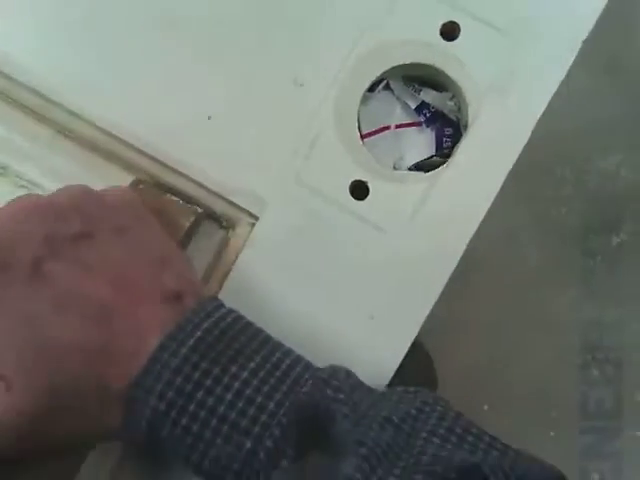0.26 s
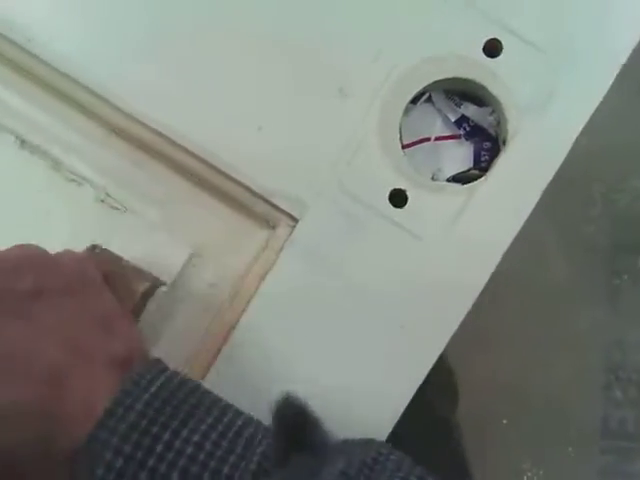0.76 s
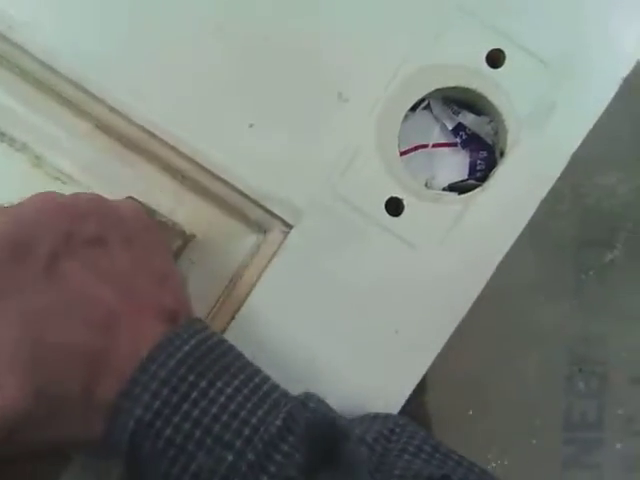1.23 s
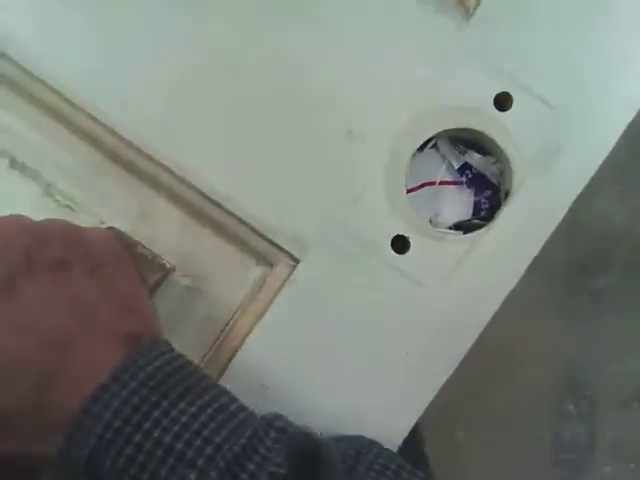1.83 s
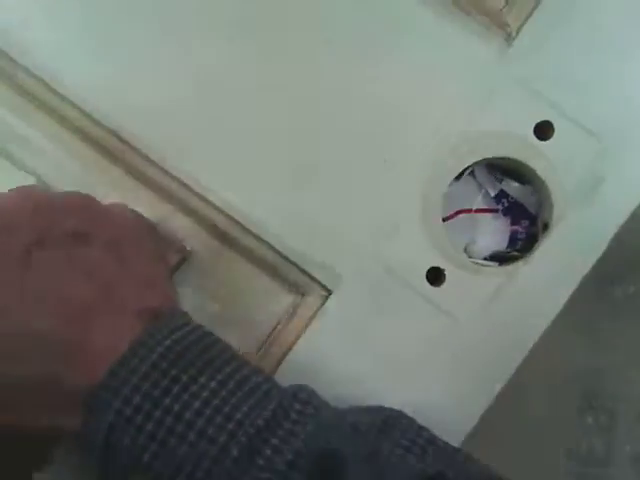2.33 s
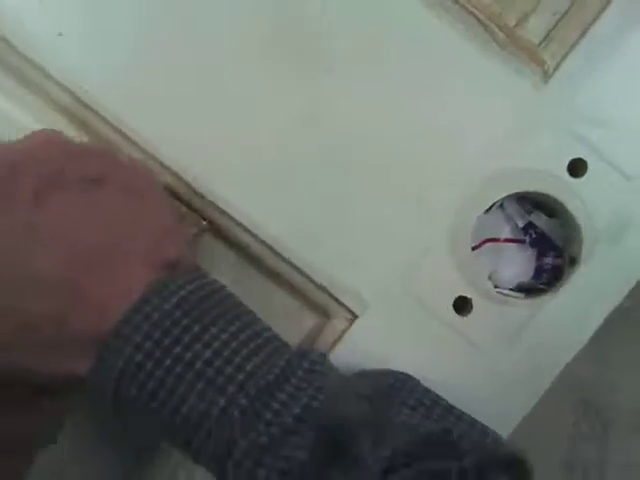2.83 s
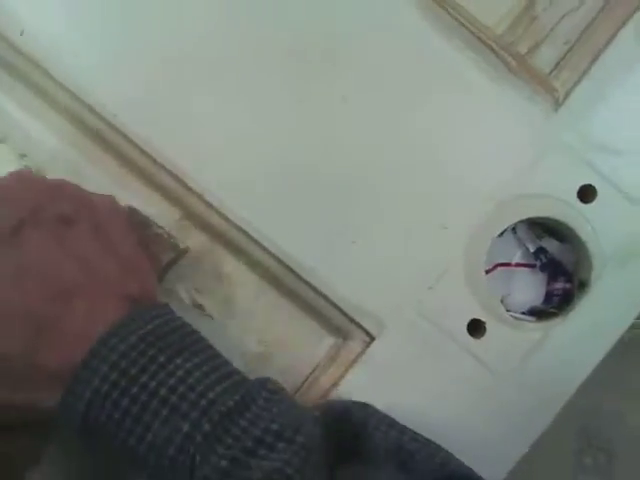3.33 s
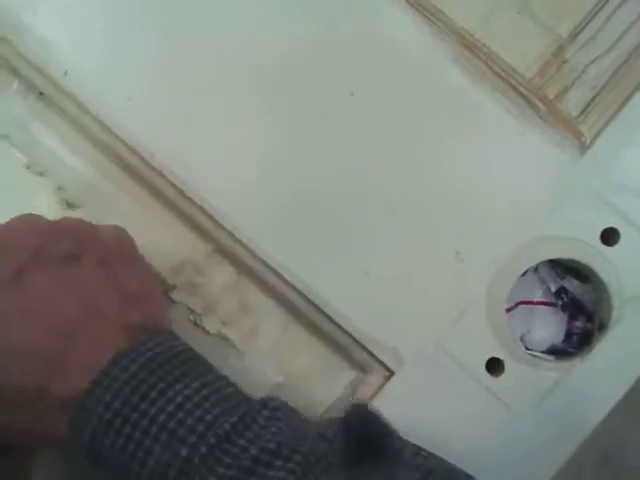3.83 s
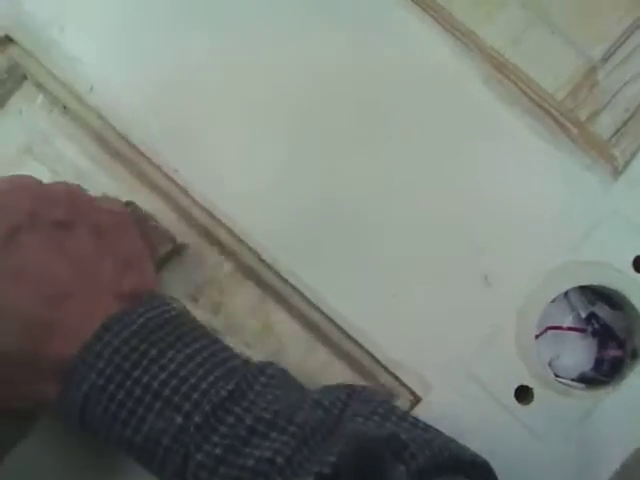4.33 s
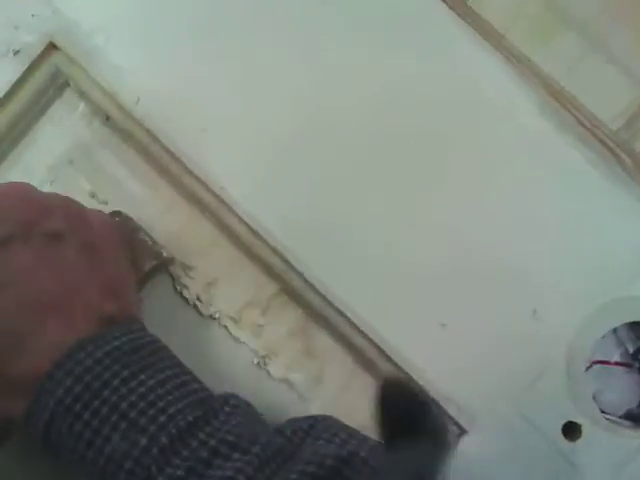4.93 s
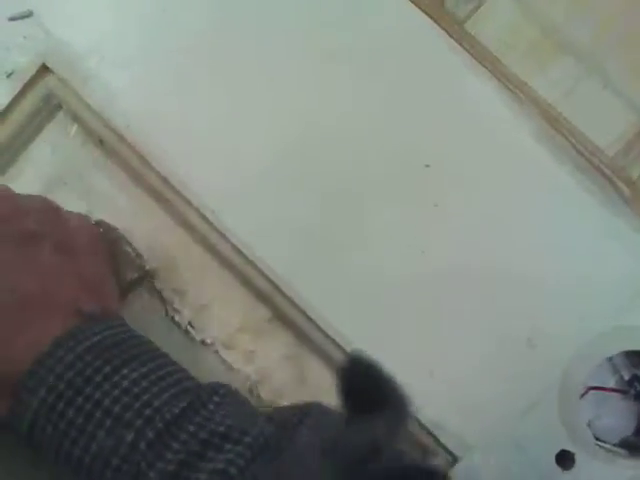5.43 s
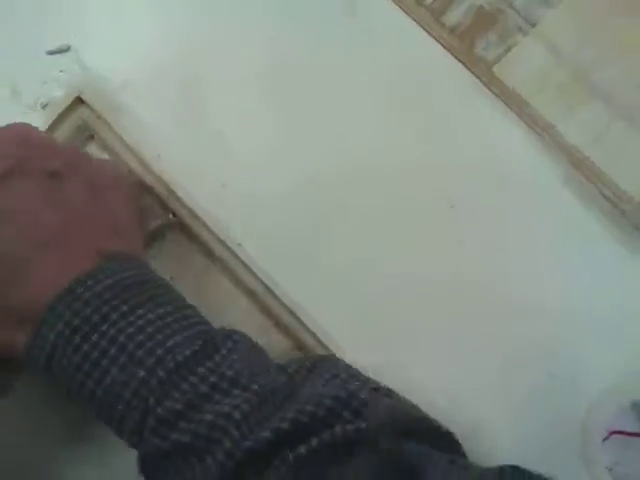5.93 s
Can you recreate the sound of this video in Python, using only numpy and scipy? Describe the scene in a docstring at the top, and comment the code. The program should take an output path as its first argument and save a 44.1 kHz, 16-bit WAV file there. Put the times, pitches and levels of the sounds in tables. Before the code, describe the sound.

Heard from close by in a small workroom, a blade scrapes back and forth on a painted wooden door in a quick, even rhythm. Each gritty pull is followed by a lighter push. Wooden knocks against the moulding cluster around the middle, and small cracks of breaking paint come mostly near the end. Soft rushing air and a low electrical hum continue underneath, all slightly muffled by the microphone.

```python
"""Scraping paint from a door

A hand scraper rasps old paint off a wooden door: about two and a half pulls a second, with lighter pushes
between. Stick-slip friction excites the resonances of the panel and the steel blade; chips snap off, and
now and then the tool knocks on the moulding. A small workroom adds reverberation, a fan-like rush and
mains hum. All is heard from close by, through a small narrow-band camera."""
import sys
import numpy as np
from scipy import signal
from scipy.fft import rfft, irfft, next_fast_len
from scipy.io import wavfile

SR = 44100
rng = np.random.default_rng(int(sys.argv[2]) if len(sys.argv) > 2 else 0)


def inscribe(sig):
    """Save sig as 16-bit PCM at rate SR to the path in sys.argv[1].

    A 1-D sig is mono; a 2-D sig holds one channel per row.
    Samples are clipped to [-1, 1] before scaling.
    """
    pcm = np.round(np.clip(np.atleast_2d(sig).T, -1, 1) * 32767)
    wavfile.write(sys.argv[1], SR, pcm.astype(np.int16))


N = 272097

# cutting pulls: (start [s], length [s], door level [dB], blade level [dB], door resonance [Hz],
# blade resonance [Hz], approach level relative to the bite [dB])
PULL_STROKES = [(0.605, 0.046, -19.5, -26, 1170, 2580, -17), (1.13, 0.049, -33, -38.5, 900, 2600, -12),
                (1.475, 0.046, -13, -21.5, 894, 2730, -28), (1.934, 0.048, -9.5, -14, 1236, 2710, -25),
                (2.368, 0.049, -7.5, -13, 1207, 2760, -37), (2.781, .058, -16, -26, 880, 2770, -5.5),
                (3.182, 0.049, -8.5, -16.5, 930, 2750, -19.5), (3.554, 0.072, -16, -24, 890, 2660, -23),
                (3.998, 0.04, -10.5, -19.5, 950, 2700, -23), (4.375, 0.067, -11, -20, 1304, 2060, -15),
                (4.749, 0.054, -15, -22, 1095, 2120, -7.5), (5.138, 0.059, -11.5, -16.5, 1205, 2620, -21),
                (5.548, 0.046, -11.5, -19.5, 1253, 2090, -10), (5.863, 0.047, -16.5, -25, 1190, 2600, -23)]
# return pushes: (start [s], length [s], door level [dB], blade level [dB], blade resonance [Hz],
# first touch relative to the slide [dB])
PUSH_STROKES = [(0.16, 0.027, -18.5, -24, 2500, -5.5), (.365, 0.058, -36, -36, 2550, -19),
                (0.721, 0.086, -25, -32.5, 2550, -4), (0.931, .05, -31.5, -48, 2580, -14),
                (1.22, 0.026, -29, -50, 2600, -12), (1.398, 0.05, -19, -26.5, 2390, -23),
                (1.696, 0.033, -22.5, -27.5, 2890, -24.5), (2.22, 0.063, -36, -37, 2910, -6),
                (2.616, 0.039, -22.5, -40.5, 2130, -27), (3.007, 0.035, -16.5, -20, 2600, -27),
                (3.406, 0.036, -25.5, -34, 2100, -9), (3.795, 0.032, -22.5, -30.5, 2700, -6.5),
                (4.198, 0.03, -22.5, -27.5, 2870, -5), (4.593, 0.025, -17, -21, 2930, -12),
                (4.956, .03, -19, -23, 2390, -11), (5.351, 0.043, -28.5, -28.5, 2500, 0),
                (5.733, 0.041, -16, -20, 2100, -6.5), (5.957, 0.024, -17, -23, 2600, -26),
                (6.124, 0.063, -17.5, -20.5, 2450, -11.5)]
# broad responses of the door panel and the steel blade: (frequency [Hz], relative gain [dB])
DOOR_RESPONSE = [(150, -23), (350, -6.5), (560, -6.5), (800, 2), (1050, 1.5), (1400, -1.5), (1750, -1),
                 (2300, -9), (3600, -33)]
BLADE_RESPONSE = [(700, -23), (1400, -7.5), (1900, 6), (2400, 9), (2900, -1.5), (3400, -12), (3900, -7.5)]
# their normal modes: (frequency [Hz], 60 dB decay time [s], level relative to the broad response [dB])
PANEL_MODES = [(565, .08, -20), (905, .05, -13), (1290, .05, -15), (1720, .025, -17)]
STEEL_MODES = [(2105, 0.058, -7.5), (2590, .05, -21), (2952, 0.041, -18.5), (3216, 0.09, -21)]
# impacts on the moulding: (time [s], level [dB], frequency [Hz])
MOULDING_KNOCKS = [(1.712, -13, 260), (2.634, -6, 616), (2.645, -10.5, 454), (2.652, 0, 786),
                   (3.029, -6.5, 470), (3.042, -4, 700), (3.427, -5, 856), (3.449, -5.5, 803),
                   (3.816, -8.5, 850), (4.219, -6, 458), (5.603, -18, 132)]
# paint chips breaking away: (time [s], level [dB])
PAINT_SNAPS = [(.933, -29), (1.976, -20), (2.414, -15), (4.784, -7), (4.98, -27), (5.193, -10),
               (5.366, -19), (5.576, -6)]
# spectrum of the rushing air: (frequency [Hz], relative spectral density [dB])
AIR_SPECTRUM = [(15, -39.5), (25, -12.5), (60, -8.5), (140, -0.5), (297, -1.5), (432, -6.5), (566, -1.5),
                (668, -4.5), (806, -4.5), (932, -6), (1100, -8.5), (1200, -10), (2230, -19.5), (3310, -34),
                (3600, -33.5), (4680, -67), (7920, -120)]
# slow envelope of the rushing air: (time [s], level [dB])
AIR_LEVELS = [(0, -23.5), (3, -23.5), (6.1, -22.5)]
# filter on the spectral images left by sampling: (frequency [Hz], gain [dB])
IMAGE_RESPONSE = [(4000, -3), (4700, -11), (5300, -24.5), (5700, -37), (6050, -53.5), (7100, -69),
                  (9000, -73.5), (12000, -88.5)]


def scraper(door_t60_s=.028, blade_t60_s=.012, dig_in_s=.0033):
    """Forced vibration: friction drives door and blade; contact point and grip tune each stroke."""
    slips, crumbs = stick_slip(slip_hz=450.3, jitter=.9, crumble_s=.0025)
    paint_grip = undb(1.9 * wander(110))  # thick and thin patches pass under the edge
    door_friction = unit_rms(paint_grip * (slips + undb(-3.5) * crumbs))
    blade_friction = unit_rms(paint_grip * crumbs)
    panel, steel = body(DOOR_RESPONSE, PANEL_MODES), body(BLADE_RESPONSE, STEEL_MODES)
    out = np.zeros(N)
    for start, force, door_db, blade_db, door_hz, blade_hz in [*pulls(), *pushes()]:
        door = unit_energy(panel + undb(-7) * mode(door_hz, door_t60_s))
        # the fist damps the blade, which rings more as it skates lightly over the wood
        ring_db = .5 + .5 * (blade_db - door_db)
        blade = unit_energy(steel + undb(ring_db) * mode(blade_hz, blade_t60_s))
        # the edge crackles in the paint just before it digs into the wood
        paths = [(start, blade_db, blade_friction, blade),
                 (start + dig_in_s, door_db, door_friction, door)]
        for onset, db, friction, response in paths:
            grain = friction[int(onset * SR):][:len(force)]
            excitation = force[:len(grain)] * grain
            add(out, onset, undb(db) * signal.fftconvolve(excitation, response))
    return undb(-1.5) * out


def stick_slip(slip_hz, jitter, crumble_s, count=16000):
    """Relaxation oscillation: the edge sticks and slips unevenly, each slip crumbling a little paint."""
    stick_periods = 1 + jitter * rng.uniform(-1, 1, count)
    at = (np.cumsum(stick_periods) / slip_hz * SR).astype(int)
    slips = np.bincount(at[at < N], stick_periods[at < N], N)  # a longer stick stores more force
    bursts = signal.lfilter([1], [1, -np.exp(-1 / (crumble_s * SR))], slips)
    return unit_rms(slips - slips.mean()), unit_rms(bursts * rng.standard_normal(N))


def pulls():
    """Sliding contact in three phases: a light approach, the bite, and a run-out over bare wood."""
    approach = pressure(.062, swell_share=.6, release_s=.0082)
    run_out = pressure(.05, swell_share=.15, release_s=.05)
    lead_s, run_out_door_hz, run_out_blade_hz = .041, 1500, 2100
    for start, length, door_db, blade_db, door_hz, blade_hz, approach_db in PULL_STROKES:
        bite = pressure(length, swell_share=.6, release_s=.0079)
        yield start - lead_s, undb(approach_db) * approach, door_db, blade_db, door_hz, blade_hz
        yield start, bite, door_db, blade_db, door_hz, blade_hz
        yield start + length, run_out, door_db - 10.5, blade_db - 14.5, run_out_door_hz, run_out_blade_hz


def pushes(lead_s=.037, door_hz=600):
    """Intermittent contact: the returning edge skips once, then settles and slides back."""
    touch = pressure(.039, swell_share=.46, release_s=.015)
    for start, length, door_db, blade_db, blade_hz, touch_db in PUSH_STROKES:
        slide = pressure(length, swell_share=.46, release_s=.015)
        yield start - lead_s, undb(touch_db) * touch, door_db, blade_db, door_hz, blade_hz
        yield start, slide, door_db, blade_db, door_hz, blade_hz


def pressure(length_s, swell_share, release_s):
    """Normal force of one contact: it swells, holds and relaxes exponentially."""
    t = np.arange(SR // 3) / SR
    rise = np.sin(np.pi / 2 * np.clip(t / (swell_share * length_s), 0, 1)) ** 2
    return rise * np.exp(-np.maximum(t - length_s + release_s, 0) / release_s)


def knocks(t60_cycles=12):
    """Impact excitation: thuds ring the panel; at constant Q, the lower thuds last longer."""
    panel = body(DOOR_RESPONSE, PANEL_MODES)
    panel_ring = undb(-10) * panel / np.abs(panel).max()
    t = np.arange(len(panel)) / SR
    out = np.zeros(N)
    for start, db, hz in MOULDING_KNOCKS:
        thud = np.sin(2 * np.pi * hz * t) * decay(t, t60_cycles / hz)
        add(out, start, undb(db) * (thud + panel_ring))
    return out


def flakes(snap_s=.0037):
    """Brittle fracture: chips of paint snap off and flick the steel."""
    t = np.arange(SR // 20) / SR
    cracks = np.zeros(N)
    for start, db in PAINT_SNAPS:
        add(cracks, start, undb(db) * np.exp(-t / snap_s) * rng.standard_normal(len(t)))
    return convolve(cracks, body(BLADE_RESPONSE, STEEL_MODES))


def body(spectrum, modes, size=8192):
    """Modal superposition: a struck part answers with a broad dead click plus ringing modes."""
    gain = curve_gain(spectrum, np.fft.rfftfreq(size, 1 / SR))
    cepstrum = irfft(np.log(gain))
    cepstrum[1:size // 2] *= 2  # folding the cepstrum gives a causal, minimum-phase click
    cepstrum[size // 2 + 1:] = 0
    click = unit_energy(irfft(np.exp(rfft(cepstrum))))
    ringing = sum(undb(db) * mode(hz, t60_s) for hz, t60_s, db in modes)
    return unit_energy(click + ringing)


def mode(hz, t60_s, size=8192):
    """Free vibration of a damped oscillator, at unit energy."""
    t = np.arange(size) / SR
    return unit_energy(np.cos(2 * np.pi * hz * t) * decay(t, t60_s))


def room(direct, t60_s=.26, gap_s=.0044, reverb_db=-7.5):
    """Reverberation: dense reflections from bench and walls shift in pattern as the hand moves."""
    t = np.arange(SR // 2) / SR
    tails = rng.standard_normal((4, len(t))) * decay(t, t60_s) * (t > gap_s)
    shares = np.array([wander(4) for _ in tails])
    shares /= np.sqrt(np.sum(shares ** 2, axis=0))  # constant total power
    reflections = sum(convolve(direct * share, unit_energy(tail)) for share, tail in zip(shares, tails))
    return direct + undb(reverb_db) * reflections


def fan(hum_hz=117.5, hum_db=-38.5):
    """Broadband noise plus a tone: rushing air over mains hum that wavers in phase and level."""
    t = np.arange(N) / SR
    air_db = np.interp(t, *np.transpose(AIR_LEVELS)) + .5 * wander(20)
    air = unit_rms(colour(rng.standard_normal(N), AIR_SPECTRUM))
    hum = np.sqrt(2) * np.sin(2 * np.pi * hum_hz * t + .91 * wander(6))
    return undb(air_db) * air + undb(hum_db - wander(5.9)) * hum


def undb(db):
    """Amplitude ratio of a level in decibels."""
    return 10 ** (np.asarray(db) / 20)


def decay(t, t60_s):
    """Exponential damping by 60 dB in t60_s."""
    return np.exp(-np.log(1000) * t / t60_s)


def unit_rms(x):
    """Normalisation to unit mean power."""
    return x / np.sqrt(np.mean(x ** 2))


def unit_energy(x):
    """Energy normalisation: the response then preserves the power of white noise."""
    return x / np.sqrt(np.sum(x ** 2))


def wander(rate_hz):
    """Random modulation with a spread near 0.75."""
    knots = rng.standard_normal(N // 20)
    return .92 * np.interp(np.arange(N) / SR * rate_hz, np.arange(len(knots)), knots)


def curve_gain(points, hz):
    """Gain interpolated from (frequency [Hz], level [dB]) points on a log-frequency axis."""
    point_hz, db = np.transpose(points)
    return undb(np.interp(np.log(np.maximum(hz, 1)), np.log(point_hz), db))


def colour(x, points):
    """Spectral shaping by a (frequency [Hz], level [dB]) curve."""
    return filtered(x, lambda hz: curve_gain(points, hz))


def filtered(x, gain_at):
    """Zero-phase filtering by a gain that depends on frequency."""
    size = next_fast_len(N + 4096)
    gain = gain_at(np.fft.rfftfreq(size, 1 / SR))
    return irfft(rfft(x, size) * gain, size)[:N]


def convolve(x, response):
    """Output of a linear system with the given impulse response."""
    return signal.fftconvolve(x, response)[:N]


def add(out, start_s, x):
    """Superposition of a sound at a given time."""
    i = int(start_s * SR)
    out[i:i + len(x)] += x[:N - i]


def scene():
    """Superposition: scraping, snapping paint and knocks reverberate over the fan."""
    work = scraper() + flakes() + knocks()
    return (room(work) + fan())[None]


def record(dry, ceiling=.8, band_hz=3540, sampling_hz=8000, top_hz=15700):
    """Saturation and imaging: the camera rounds peaks, keeps a narrow band and faintly mirrors it."""
    rounded = dry[0] / (1 + (dry[0] / ceiling) ** 4) ** .25
    band = filtered(rounded, lambda hz: 1 / np.sqrt(1 + (hz / band_hz) ** 52))
    carrier = 2 * np.cos(2 * np.pi * sampling_hz * np.arange(N) / SR)
    image = colour(band * carrier, IMAGE_RESPONSE)
    lowpass = signal.ellip(8, .2, 70, top_hz, fs=SR, output="sos")
    return signal.sosfilt(lowpass, band + image)[None]


dry = scene()
out = record(dry)
inscribe(out)
```